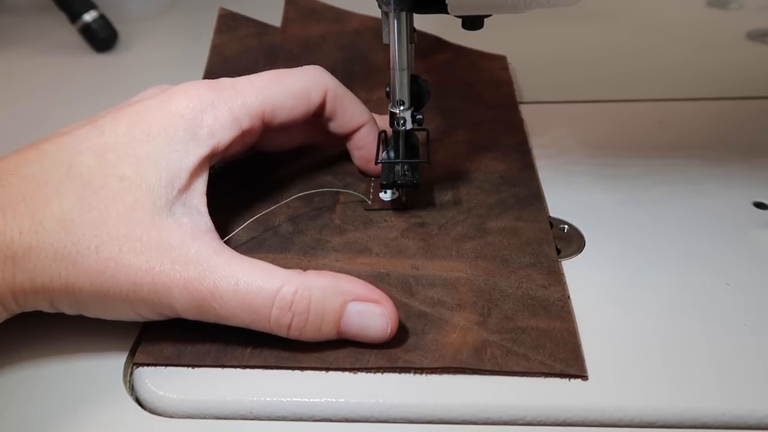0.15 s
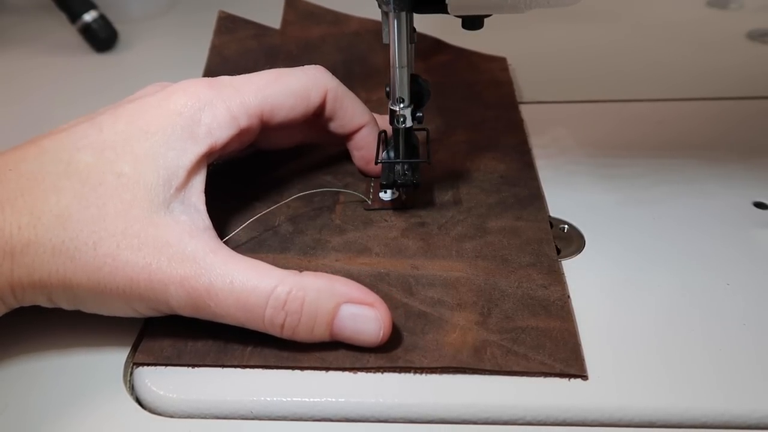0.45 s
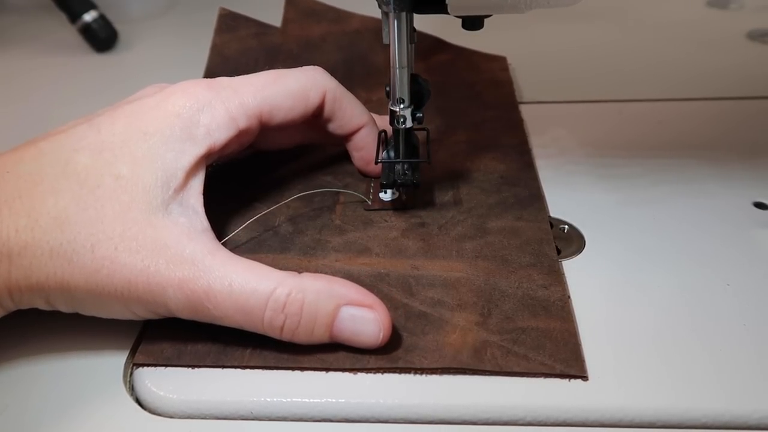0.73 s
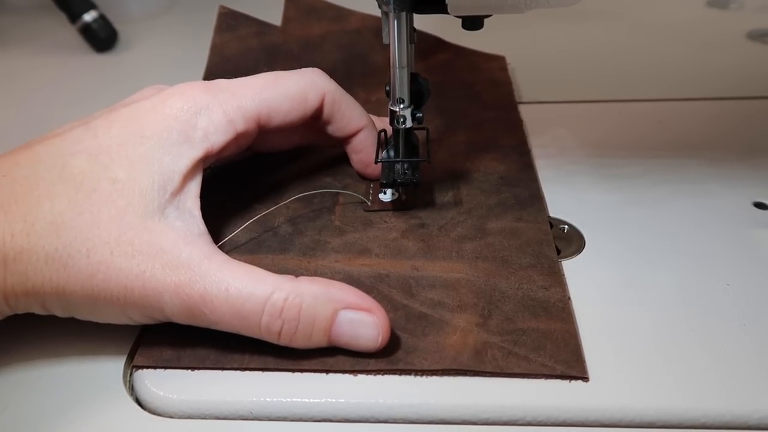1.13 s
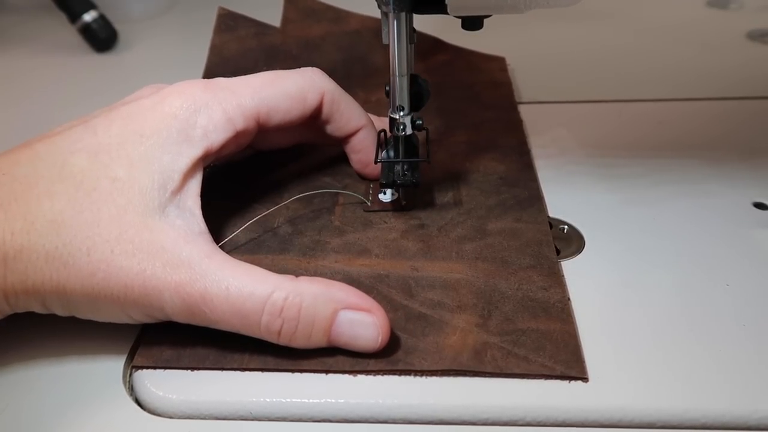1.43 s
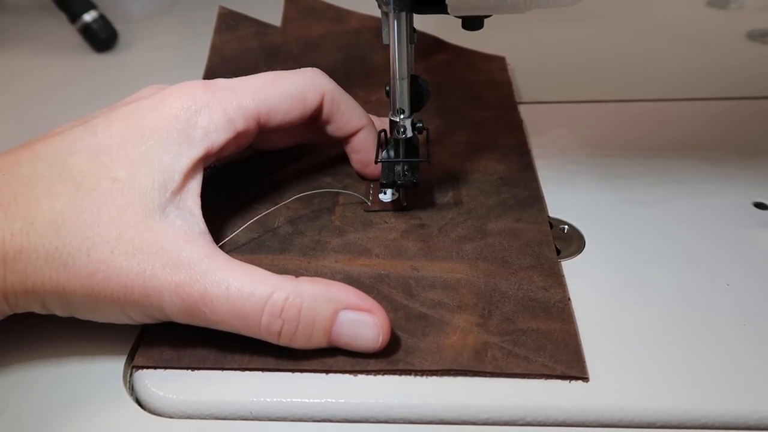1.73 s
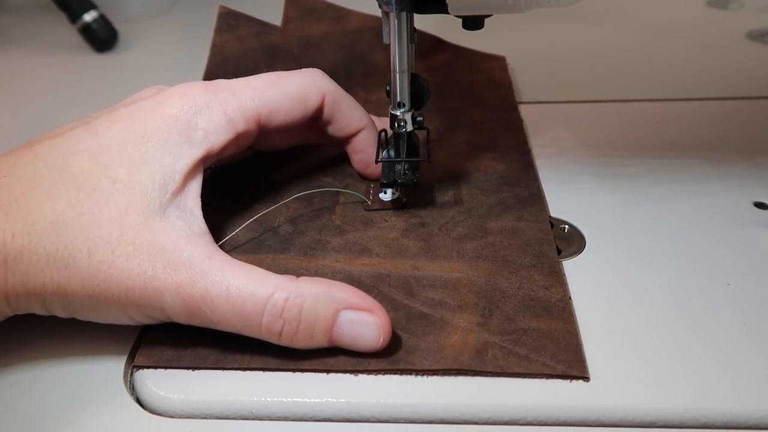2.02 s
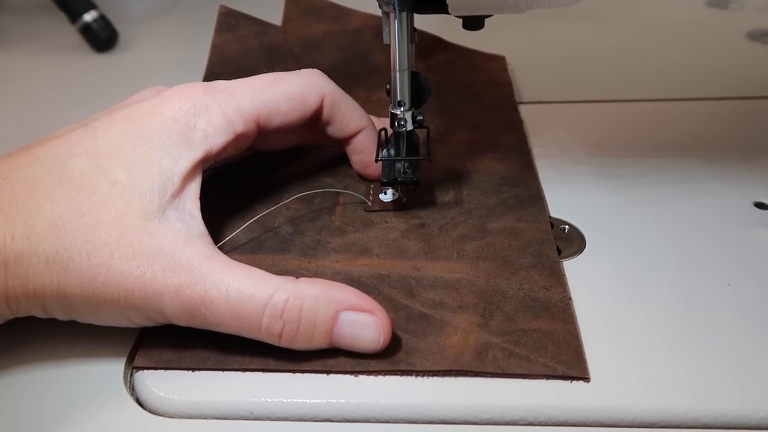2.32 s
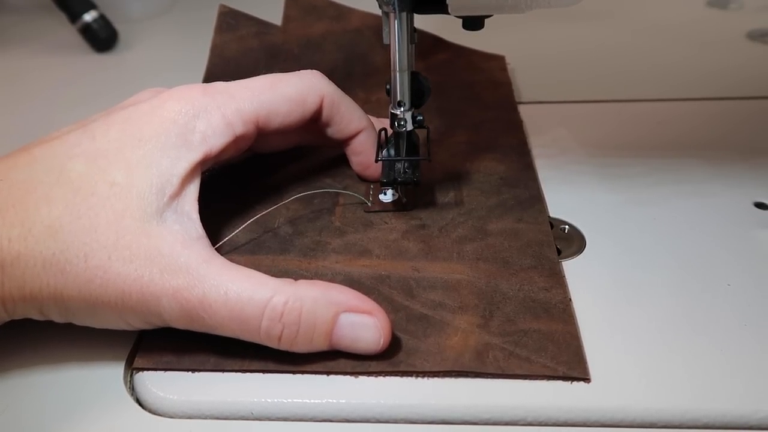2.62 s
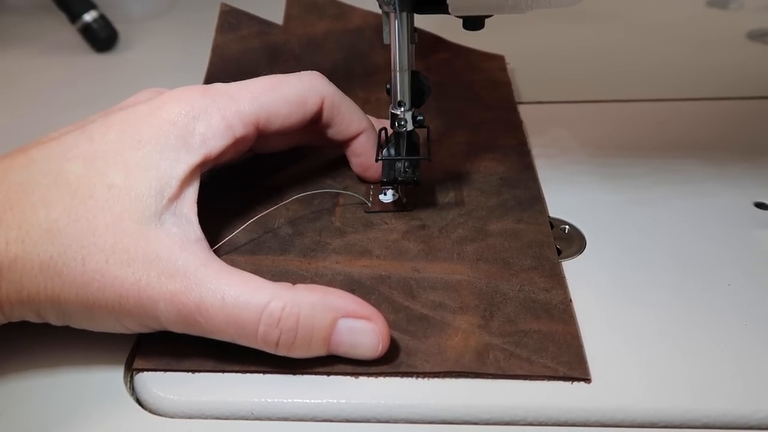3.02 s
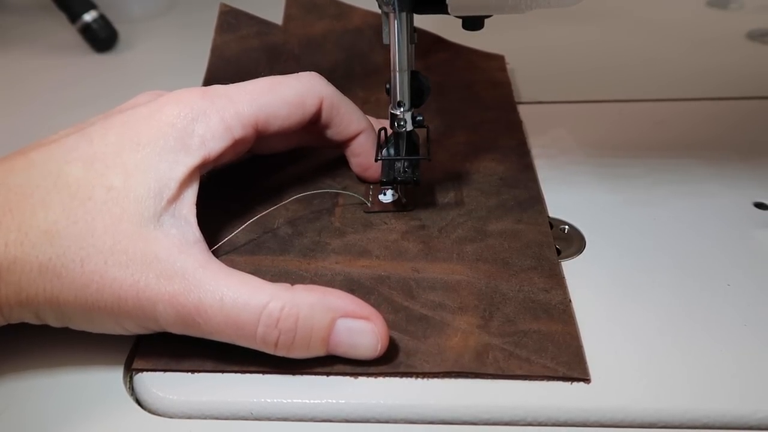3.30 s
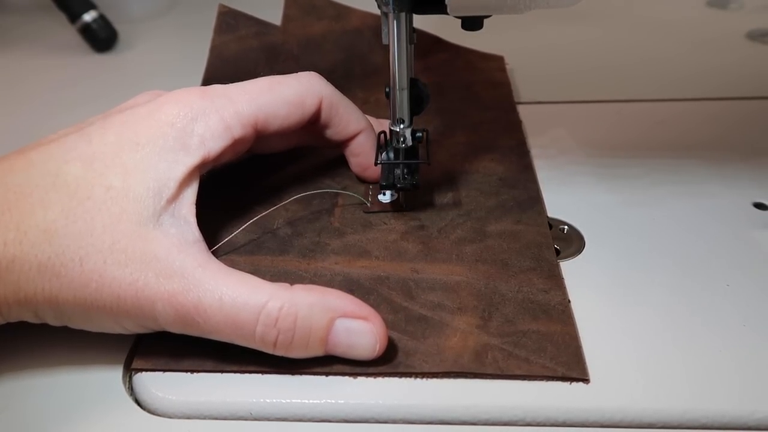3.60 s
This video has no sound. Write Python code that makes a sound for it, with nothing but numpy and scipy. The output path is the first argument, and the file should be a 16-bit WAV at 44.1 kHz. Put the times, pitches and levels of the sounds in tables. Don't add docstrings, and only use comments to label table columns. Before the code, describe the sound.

A heavy sewing machine turned slowly by hand punches leather: light linkage ticks, metal clunks with rattles, sharp cracks that shake the table, a brief creak; close microphone, small quiet room, faint motor hum.

```python
import sys
import numpy as np
from scipy import signal
from scipy.fft import rfft, irfft
from scipy.io import wavfile
from scipy.ndimage import uniform_filter1d

SR = 44100
rng = np.random.default_rng(int(sys.argv[2]) if len(sys.argv) > 2 else 0)


def inscribe(sig):
    pcm = np.round(np.clip(np.atleast_2d(sig).T, -1, 1) * 32767)
    wavfile.write(sys.argv[1], SR, pcm.astype(np.int16))


def gain_from_db(level_db):
    decades = np.asarray(level_db, float) / 20
    return 10 ** decades


N = 165375

# frequency in Hz, level in dB, t60 in seconds.
TABLE_MODES = [(94.3, -23.5, 1), (116, -7, 0.39), (133, -17, 1.62), (214, -7.5, 0.29), (251.2, -11, 0.31),
               (387, -15.5, 0.25), (468, -14.5, 0.27), (563, -7, 0.17), (809, -14, 0.29)]
# frequency in Hz, density in dB per Hz.
PUNCH_COLOUR = [(250, 14), (420, 8.5), (800, 10), (1050, -3), (1600, 3.5), (3600, 0), (4800, -13.5),
                (12000, -30)]
TICK_COLOUR = [(300, 9), (1200, -1), (2700, -4), (3700, 1.5), (5000, -12), (6000, -15.5), (12000, -26.5)]
CLUNK_COLOUR = [(100, 0.5), (180, 7.5), (400, 2), (1000, -6.5), (2300, -8.5), (3500, -12.5), (4500, -23.5),
                (15000, -42.5)]


def rms_one(x):
    return x / np.sqrt(np.mean(x ** 2) + 1e-20)


def coloured(points):
    hz, db = np.transpose(points)
    f = np.maximum(np.arange(N // 2 + 1) * SR / N, 1)
    gain = gain_from_db(np.interp(np.log(f), np.log(hz), db))
    return rms_one(irfft(rfft(rng.standard_normal(N)) * gain, N))


def blows(s, db):
    force = np.full(N, 1e-18)
    at = np.clip((np.atleast_1d(s) * SR).astype(int), 0, N - 1)
    np.add.at(force, at, gain_from_db(db))
    return force


def strike(s, db, modes, contact_s, spread_db):
    s, db = np.atleast_1d(s), np.atleast_1d(db)
    luck = spread_db * rng.standard_normal((len(s), len(modes)))
    out = 0
    for k, (hz, level_db, t60) in enumerate(modes):
        force = blows(s, db + level_db + luck[:, k])
        r, w = gain_from_db(-60 / (t60 * SR)), 2 * np.pi * hz / SR
        ring = signal.lfilter([0, np.sin(w)], [1, -2 * r * np.cos(w), r * r], force)
        out = out + (-1) ** k * ring
    soft = np.exp(-1 / (contact_s * SR))
    return signal.lfilter([(1 - soft) ** 2], [1, -2 * soft, soft ** 2], out)


def clatter(s, db, colour, rise_s, t60):
    fall, rise = gain_from_db(-60 / (t60 * SR)), np.exp(-1 / (rise_s * SR))
    swell = signal.lfilter([1 - rise], np.convolve([1, -fall], [1, -rise]), blows(s, db))
    return coloured(colour) * swell


def strokes(rows):
    t = np.arange(N) / SR
    out = 0
    for s, length, db in rows:
        lean_in = np.clip((t - s) / 0.022, 0, 1)
        let_go = np.clip((s + length - t) / 0.062, 0, 1)
        out = out + gain_from_db(db) * lean_in * let_go
    return out


def hum_and_hiss():
    # frequency in Hz, density in dB per Hz.
    floor_colour = [(15, 4.5), (40, 5.5), (80, -12.5), (135, -8), (250, -14.5), (1200, -28), (2860, -29.5),
                    (16000, -34)]
    hum_hz, hum_db, floor_db = 57.4, -66.5, -63
    hum = gain_from_db(hum_db) * np.sin(2 * np.pi * hum_hz * np.arange(N) / SR)
    return gain_from_db(floor_db) * coloured(floor_colour) + hum


def old_ring():
    # frequency in Hz, level in dB, t60 in seconds.
    leftover = [(627, -65.5, 0.49), (570, -70.5, .6), (135, -66.5, 1.06)]
    return strike(0, 0, leftover, .0001, 0)


def rubbing():
    # start in seconds, length in seconds, level in dB.
    rubs = [(0.271, 0.082, -63), (1.406, 0.24, -65), (2.054, 0.19, -63), (2.766, 0.065, -64),
            (3.504, 0.21, -58), (3.664, 0.23, -61.5)]
    drags = [
        (.21, 0.38, -77),
        (1.375, 0.32, -82),
        (2.91, 0.1, -77),
        (3.416, 0.13, -71),
    ]
    # frequency in Hz, density in dB per Hz.
    rub_colour = [(150, 6), (300, 6.5), (1000, -21.5), (2400, -8.5), (3600, -9), (4500, -15.5),
                  (12000, -34)]
    drag_colour = [(1500, -30), (2300, -12), (2620, -4.5), (3000, -21), (3350, -17), (3650, -2), (3950, -8),
                   (6000, -30)]
    grain = gain_from_db(2.8 * rms_one(uniform_filter1d(rng.standard_normal(N), size=200)))
    friction = strokes(rubs) * rms_one(grain * coloured(rub_colour))
    return friction + strokes(drags) * coloured(drag_colour)


def bumps():
    # start in seconds, level in dB.
    wheel_bumps = [(1.558, -35.5), (2.231, -38), (2.622, -37), (2.787, -39), (3.331, -43.5)]
    nudges = [
        (1.735, -58),
        (3.604, -46),
    ]
    s, db = np.transpose(wheel_bumps)
    swing = strike(s - .006, db, [(70, 0, 0.053)], 0.0016, 0)
    return swing + strike(*np.transpose(nudges), TABLE_MODES, 0.00027, 0)


def hide_shift():
    # start in seconds, level in dB.
    knocks = [
        (2.188, -58),
        (2.197, -48.5),
        (2.209, -54),
        (2.219, -66),
    ]
    # frequency in Hz, level in dB, t60 in seconds.
    plate = [(330, -4, 0.086), (685, -2.5, 0.061), (914, -3, 0.033), (1230, -9, 0.027)]
    # frequency in Hz, density in dB per Hz.
    scuff_colour = [(150, 4.5), (330, 5.5), (800, -7), (1300, -12), (2000, -38), (9000, -52)]
    scuff = clatter(2.187, -56, scuff_colour, 0.0022, 0.94)
    return scuff + strike(*np.transpose(knocks), plate, .0001, 1.9)


def creak():
    # start in seconds, peak in dB.
    slips = [(1.6167, -51.5), (1.6274, -50.5), (1.6402, -50), (1.6501, -49), (1.6624, -49.5), (1.6734, -49),
             (1.6834, -49.5), (1.6924, -54.5), (1.7004, -50.5), (1.7084, -61)]
    # frequency in Hz, level in dB, t60 in seconds.
    bed = [(491, -1.5, 0.065), (791, -2.5, 0.068), (986, -7.5, 0.11), (1222, 2.5, 0.056), (1307, 1, 0.055),
           (1665, 0.5, 0.029), (2314, -3.5, 0.061), (2900, -14, 0.02), (3200, -6.5, 0.059),
           (3640, -6, 0.022), (4310, -4.5, 0.044), (4750, -2.5, 0.042), (5330, -13, .03), (6970, -7, 0.036)]
    s, db = np.transpose(slips)
    out = strike(s, db - 1, bed, .00004, 0.55)
    out = out + clatter(s, db - 6.5, TICK_COLOUR, 0.0027, 0.092)
    return out + strike(s, db - 15, TABLE_MODES, 0.000067, 8.7)


def judder():
    # frequency in Hz, level in dB, t60 in seconds.
    stand = [(116, 4, 0.065), (228.5, -1, 0.11), (399, -37, 0.06), (471, -11.5, 0.052), (590, -18.5, 0.096)]
    start_s, gap_s, first_db, grow_db = 3.6535, .0086, -53.5, 4.5
    s = start_s + gap_s * np.arange(11)
    db = first_db + grow_db * np.log2(np.arange(1, 12))
    return strike(s, db, stand, 0.00014, 0.77) + clatter(s, db - 15, PUNCH_COLOUR, 0.0018, 0.15)


def linkage():
    # start in seconds, clatter peak, hook ring, guide ring and link ring in dB.
    ticks = [(0.209, -60, -75, -65, -59), (0.2172, -56.5, -76, -71, -54.5), (0.2647, -52.5, -79, -77, -58),
             (0.2905, -53, -69, -57, -54), (0.3143, -65, -54.5, -52, -61), (0.3835, -53, -74, -59, -56.5),
             (0.41, -49, -62, -56, -61), (0.4726, -48.5, -63, -77, -54.5), (0.4842, -46, -50.5, -64, -62),
             (0.4975, -45, -70, -44, -57), (1.3745, -57.5, -74, -88, -66), (1.4018, -56.5, -72, -72, -72),
             (1.448, -45.5, -77, -62, -57), (1.5251, -49, -73, -50, -45), (2.069, -55.5, -78, -64, -49.5),
             (2.9114, -54, -84, -70, -56), (2.9551, -55, -85, -71, -56.5), (3.4161, -53.5, -65, -55, -45),
             (3.47, -54.5, -62, -59.5, -47.5), (3.6005, -42.5, -67, -55, -48)]
    # frequency in Hz, level in dB, t60 in seconds.
    link = [(1730, -9.5, 0.009), (2553, -9.5, 0.052), (2683, 1, 0.018), (4530, -8, 0.034),
            (5050, -5.5, 0.016), (8300, -13.5, 0.02)]
    hook = [(6600, 0, 0.02), (8600, -11, 0.019)]
    guide = [(3630, -6.5, 0.13), (3730, -9.5, 0.091)]
    s, db, hook_db, guide_db, link_db = np.transpose(ticks)
    out = strike(s, link_db, link, .00003, 2.0) + clatter(s, db - 6.0, TICK_COLOUR, 0.00086, 0.065)
    return out + strike(s, hook_db, hook, .00002, 0) + strike(s, guide_db, guide, .00002, 0)


def spring_and_thread():
    # start in seconds, level in dB.
    blips = [(0.193, -64), (1.276, -63), (2.645, -63.5), (3.345, -65)]
    snaps = [
        (3.593, -43),
    ]
    # frequency in Hz, level in dB, t60 in seconds.
    tension_spring = [(2430, 0, 0.045)]
    taut_thread = [(5310, -0.5, 0.019), (9070, -10, 0.011), (10370, -4.5, .012), (11800, -10, 0.019),
                   (15400, -6, 0.012)]
    # frequency in Hz, density in dB per Hz.
    snap_colour = [(2000, -11), (5300, 6), (7000, -8), (11000, 0), (13000, -8), (15500, -12),
                   (16500, -13.5)]
    s, db = np.transpose(snaps)
    snap = strike(s, db, taut_thread, .00001, 0) + clatter(s, db - 10.5, snap_colour, 0.0003, 0.044)
    return snap + strike(*np.transpose(blips), tension_spring, .00006, 0)


def latch():
    # frequency in Hz, level in dB, t60 in seconds.
    latch_modes = [(1250, -3, 0.066), (890, -6, 0.035)]
    return strike(3.525, -42, latch_modes, .0001, 0)


def rattles():
    # start in seconds, level in dB.
    loose_hits = [(0.514, -44), (.521, -55), (.556, -59), (1.485, -51), (1.513, -52), (2.095, -46),
                  (2.131, -59.5), (3.543, -47), (3.554, -53)]
    # frequency in Hz, density in dB per Hz.
    rattle_colour = [(300, -5), (700, -4.5), (1100, -1.5), (2000, -6.5), (3300, -4.5), (4300, -18.5),
                     (10000, -36)]
    return clatter(*np.transpose(loose_hits), rattle_colour, 0.0016, 0.032)


def clunks():
    # start in seconds, clatter peak, table push and bar end ring in dB.
    landings = [
        (0.3, -47, -58, -73),
        (0.5026, -37, -40, -44.5),
        (1.468, -36, -40.5, -42),
        (2.08, -43, -45.5, -54),
        (3.535, -35.5, -42.5, -51),
    ]
    # frequency in Hz, level in dB, t60 in seconds.
    feed_bar = [(114, -13.5, 0.16), (136.8, -12.5, 0.73), (178.7, 2, 0.13), (278, -27, 0.092),
                (349, -13, 0.24), (424, -24, 0.042), (692.6, -12.5, 0.27), (925.5, -10, 0.23),
                (1200, -7.5, 0.047)]
    bar_end = [(1758, 3.5, 0.043), (2740, 11, 0.017), (3160, -15, .02)]
    s, db, push_db, end_db = np.transpose(landings)
    far_end_s = s + .012
    grit = clatter(s, db - 4.5, CLUNK_COLOUR, 0.0042, 0.062)
    grit = grit + clatter(s, db - 13.5, CLUNK_COLOUR, 0.00089, 0.38)
    thud = strike(s, push_db, feed_bar, .00005, 1.0)
    thud = thud + strike(far_end_s, push_db - 9, feed_bar[3:], .00004, 2.0)
    ring = strike(s + 0.001854, end_db - 4.5, bar_end, .00004, 0.87)
    ring = ring + strike(far_end_s, end_db - 8.5, bar_end, .00004, 1.9)
    return grit + thud + ring


def punches():
    # start in seconds, crack peak in dB, table push in dB, lead of the push in seconds.
    needle_slips = [(0.7912, -40, -42.5, 0.0037), (0.8153, -51, -45.5, 0.0042), (1.073, -36, -40.5, 0.0034),
                    (1.1038, -46, -43, 0.0036), (2.27, -38.5, -44, 0.00397), (2.3033, -44, -43.5, 0.0038),
                    (2.329, -44, -42, 0.00374), (2.35, -43.5, -49, 0.0034), (2.3673, -39, -41, 0.003),
                    (2.388, -45.5, -43, 0.0039), (3.1382, -31.5, -36, 0.0044), (3.169, -41, -48, 0.0049)]
    # frequency in Hz, level in dB, t60 in seconds.
    needle_bar = [(1592, -3.5, 0.019), (1857, -11, 0.075), (2550, -4, 0.015), (2830, -4.5, 0.026),
                  (2960, 0, 0.019), (3575, 7, 0.017), (3806, 5.5, 0.018), (3804, 8, 0.013),
                  (4400, -5, 0.02), (6530, -7, 0.013)]
    slow_swell = [(211.3, 0, .28), (202, 0, 0.052)]
    s, crack_db, push_db, lead_s = np.transpose(needle_slips)
    give = clatter(s - 0.00089, crack_db - 14.5, PUNCH_COLOUR, 0.0012, 0.017)
    crack = strike(s, crack_db - 5.0, needle_bar, .00005, 1.0)
    crack = crack + clatter(s, crack_db - 6.0, PUNCH_COLOUR, 0.0028, 0.035)
    crack = crack + clatter(s, crack_db - 23.5, CLUNK_COLOUR, 0.0024, 0.17)
    push_s = s - lead_s
    table = strike(push_s, push_db, TABLE_MODES, 0.00038, 1.0)
    table = table + strike(push_s + 0.0023, push_db + 3, slow_swell, 0.00056, 0)
    rock_hz, split_hz = 41.66, 7.8
    rock_modes = [(rock_hz - split_hz / 2, -7.5, 1), (rock_hz + split_hz / 2, -7.5, 1)]
    return give + crack + table + strike(s, push_db, rock_modes, 0.0038, 0)


def room(x):
    t60, level_db = .28, -16
    t = np.arange(SR // 2) / SR
    tail = rng.standard_normal(len(t)) * gain_from_db(-60 * t / t60) * np.clip(t / 0.0085, 0, 1)
    tail = signal.sosfilt(signal.butter(2, [250, 3000], "band", fs=SR, output="sos"), tail)
    tail = tail / np.sqrt(np.sum(tail ** 2))
    return gain_from_db(level_db) * signal.fftconvolve(x, tail)[:N]


def scene():
    machine = old_ring() + rubbing() + bumps() + hide_shift() + creak() + judder()
    machine = machine + linkage() + spring_and_thread() + latch() + rattles() + clunks() + punches()
    return (machine + room(machine) + hum_and_hiss())[None]


def top_cut(x):
    return signal.sosfilt(signal.butter(12, 15800, fs=SR, output="sos"), x)


def record(dry):
    return top_cut(dry)


dry = scene()
out = record(dry)
inscribe(out)
```